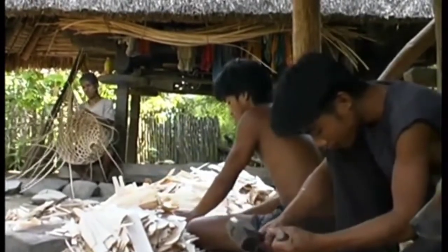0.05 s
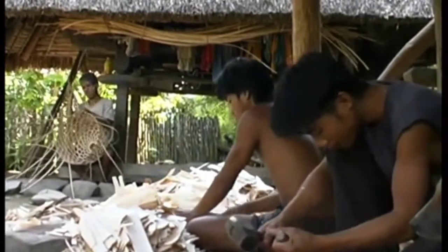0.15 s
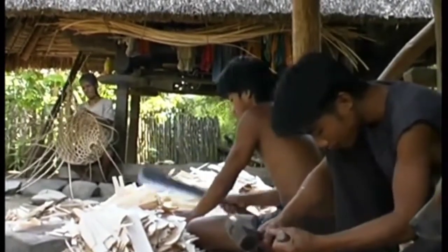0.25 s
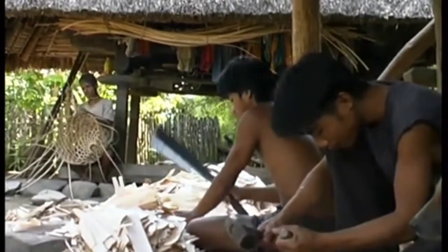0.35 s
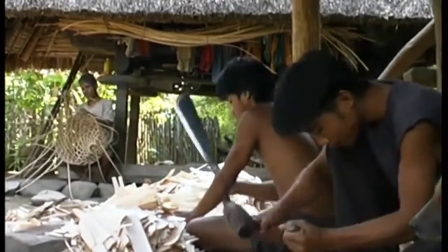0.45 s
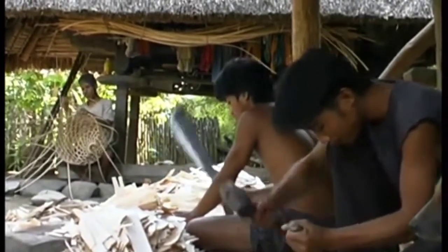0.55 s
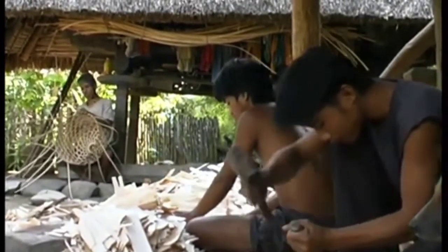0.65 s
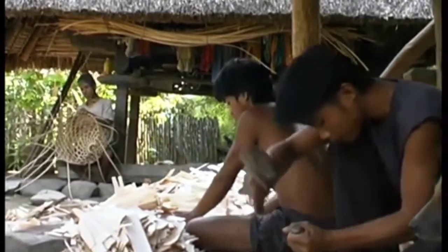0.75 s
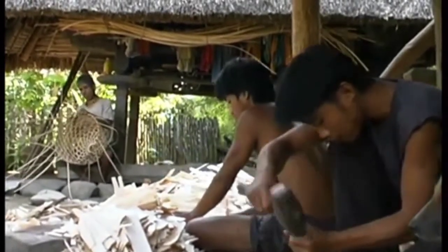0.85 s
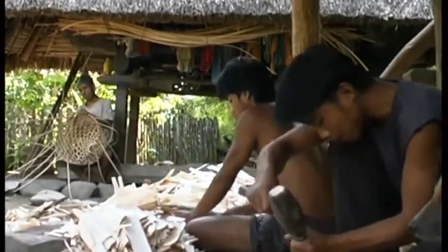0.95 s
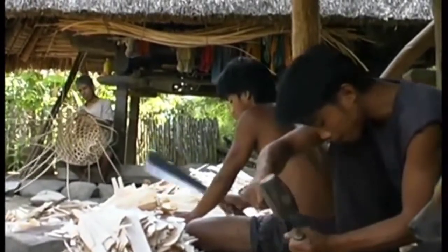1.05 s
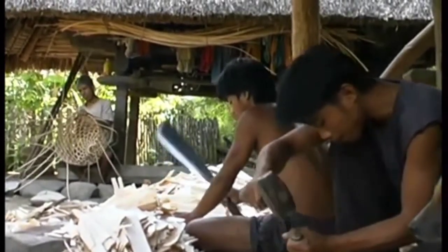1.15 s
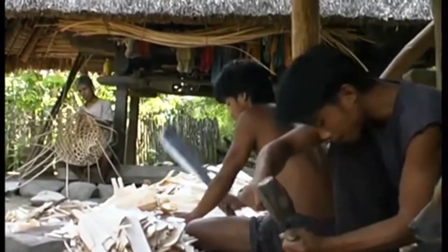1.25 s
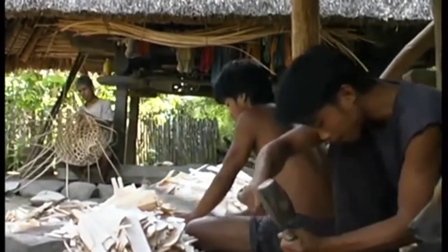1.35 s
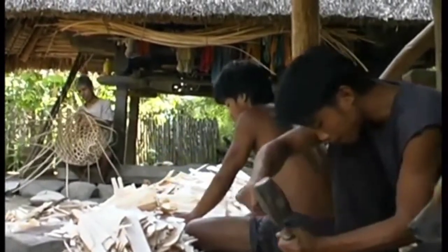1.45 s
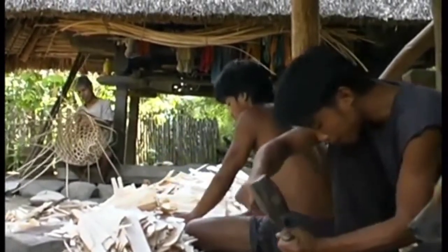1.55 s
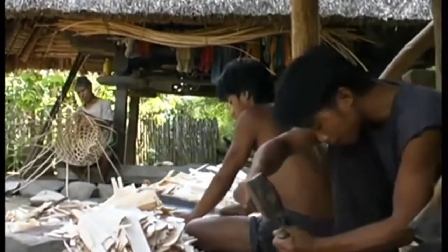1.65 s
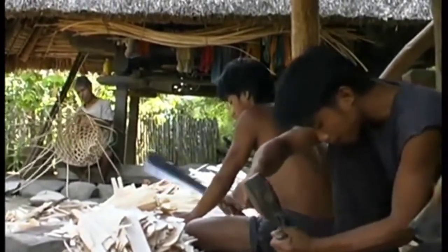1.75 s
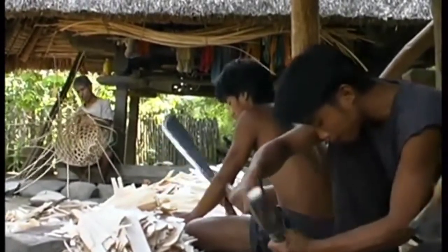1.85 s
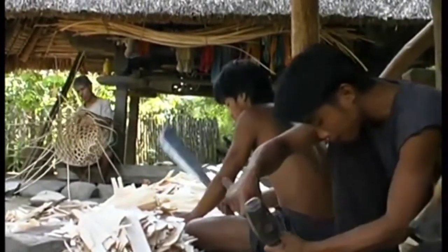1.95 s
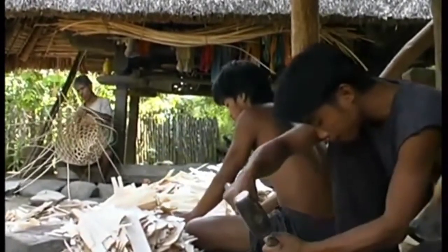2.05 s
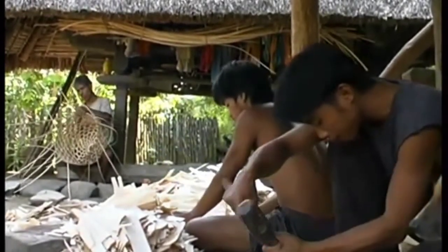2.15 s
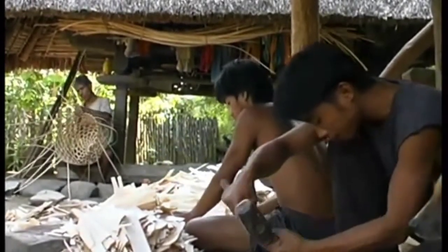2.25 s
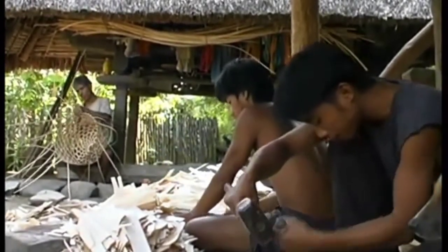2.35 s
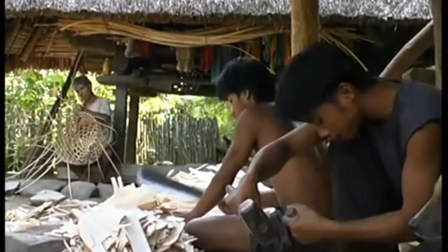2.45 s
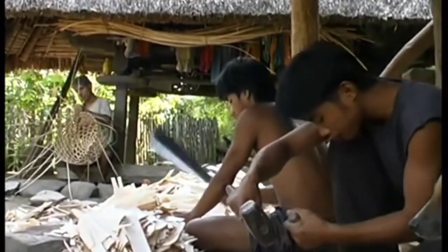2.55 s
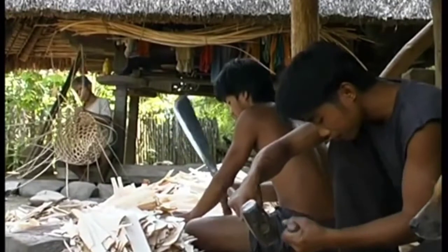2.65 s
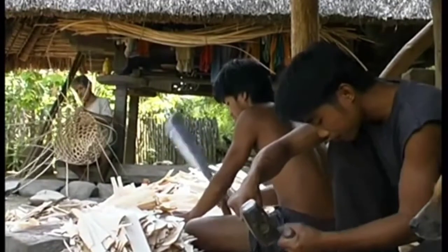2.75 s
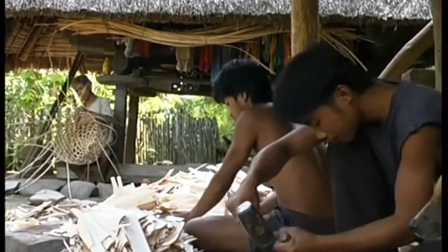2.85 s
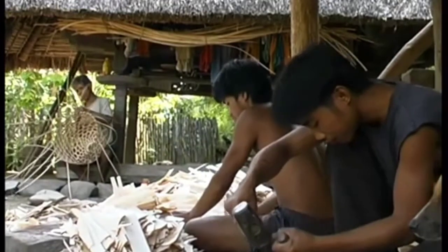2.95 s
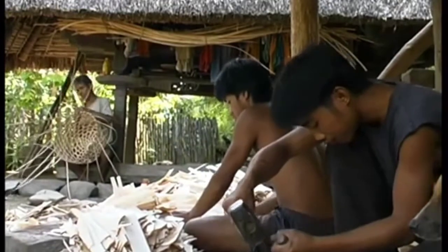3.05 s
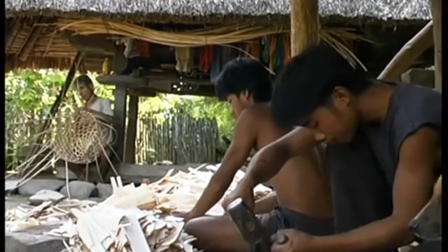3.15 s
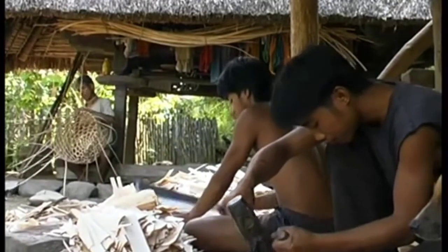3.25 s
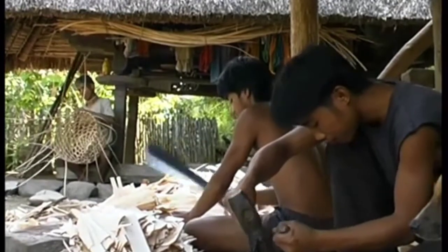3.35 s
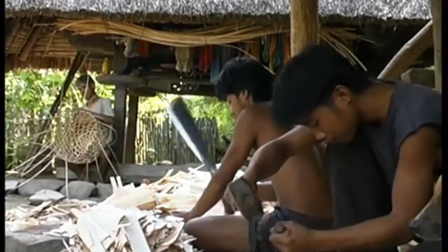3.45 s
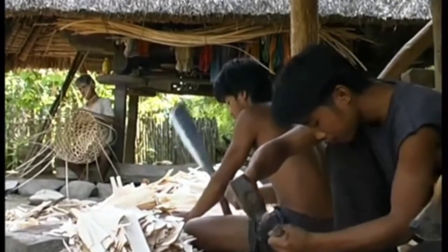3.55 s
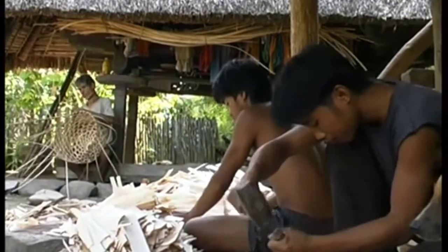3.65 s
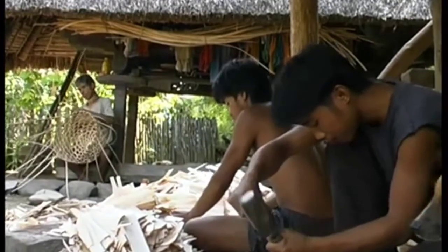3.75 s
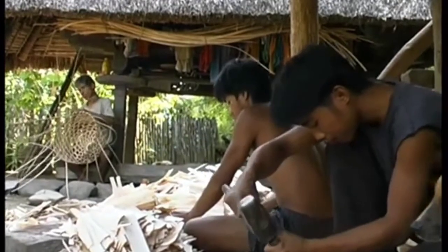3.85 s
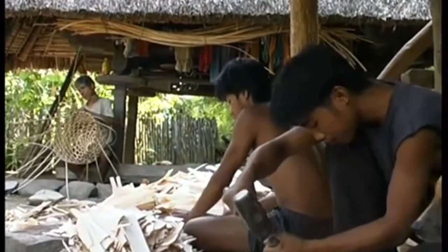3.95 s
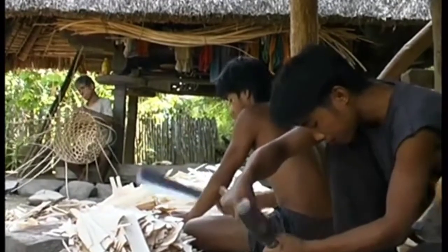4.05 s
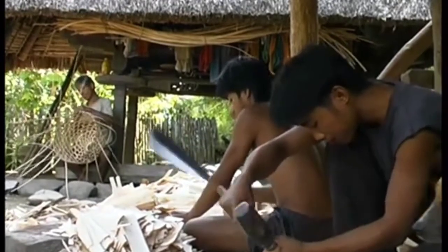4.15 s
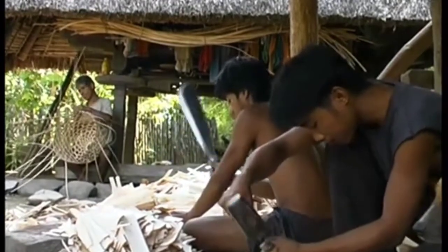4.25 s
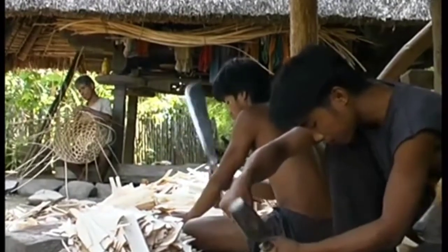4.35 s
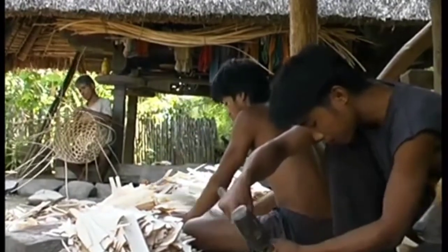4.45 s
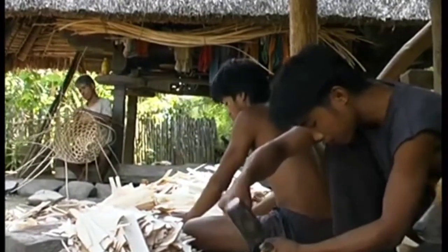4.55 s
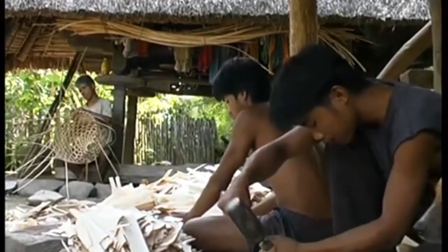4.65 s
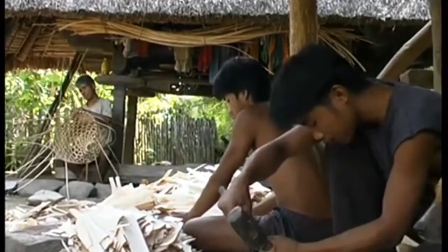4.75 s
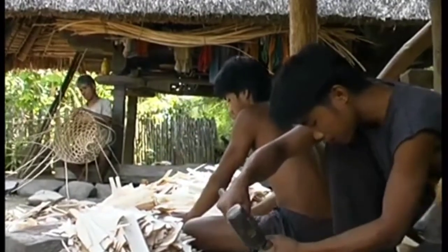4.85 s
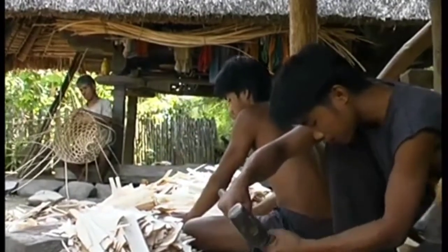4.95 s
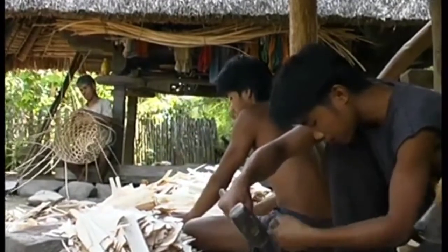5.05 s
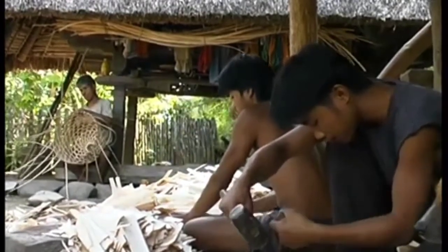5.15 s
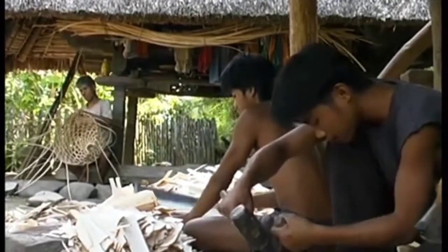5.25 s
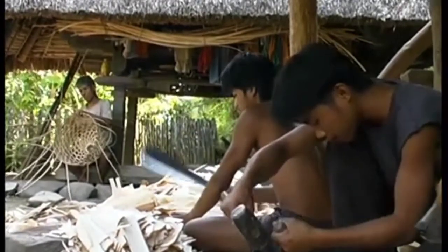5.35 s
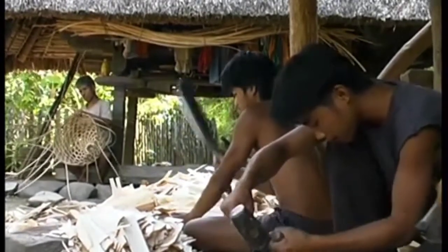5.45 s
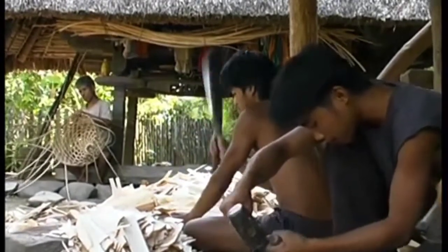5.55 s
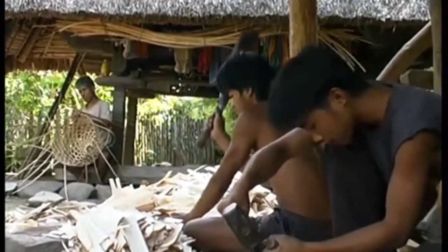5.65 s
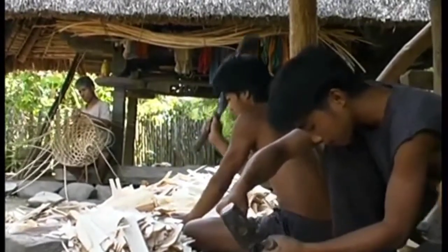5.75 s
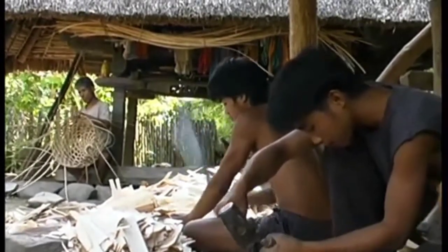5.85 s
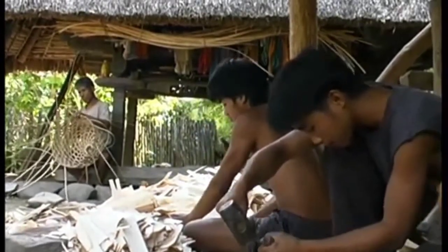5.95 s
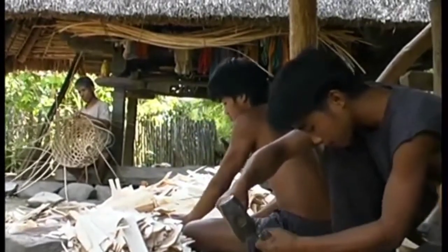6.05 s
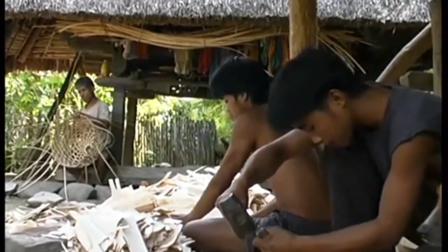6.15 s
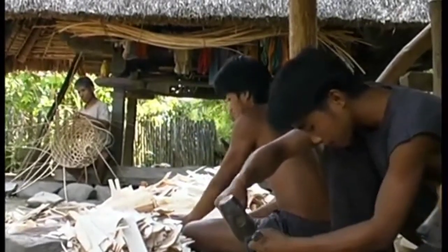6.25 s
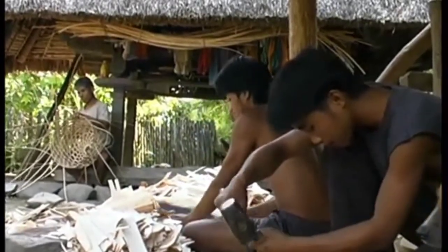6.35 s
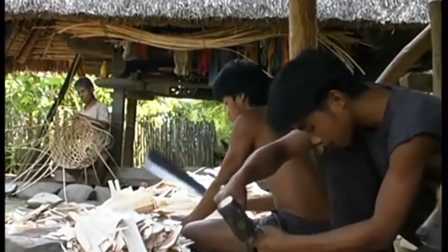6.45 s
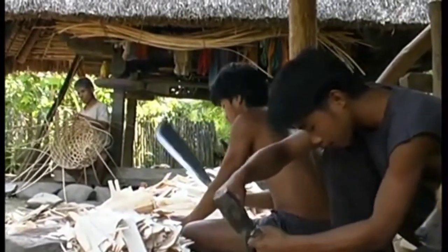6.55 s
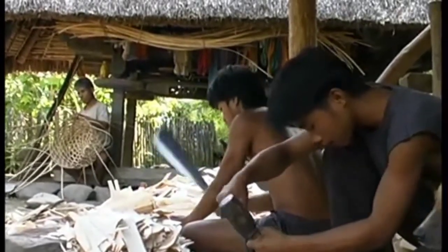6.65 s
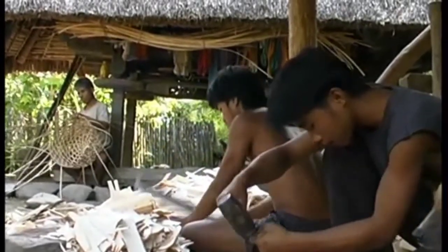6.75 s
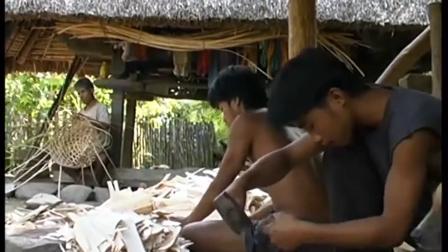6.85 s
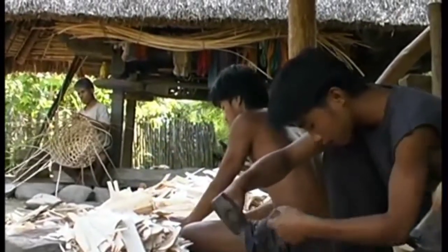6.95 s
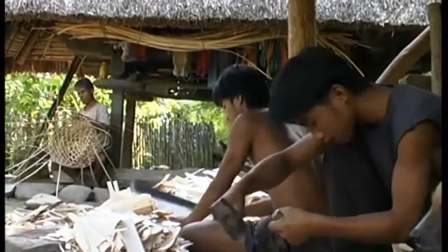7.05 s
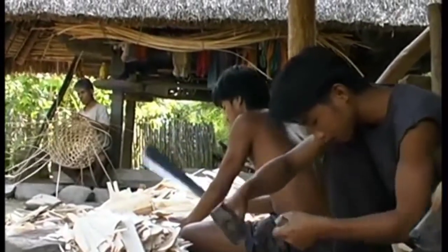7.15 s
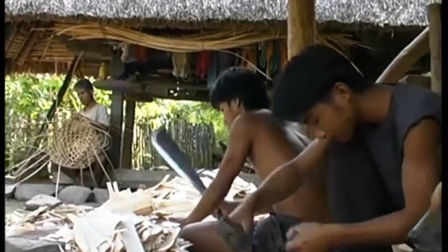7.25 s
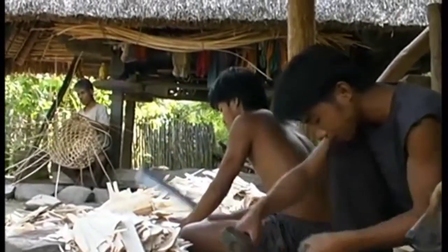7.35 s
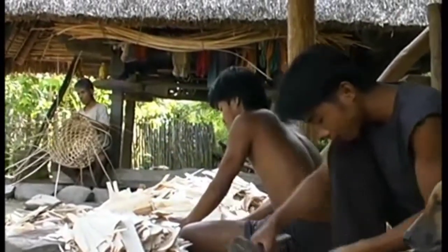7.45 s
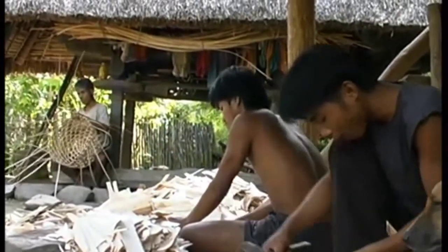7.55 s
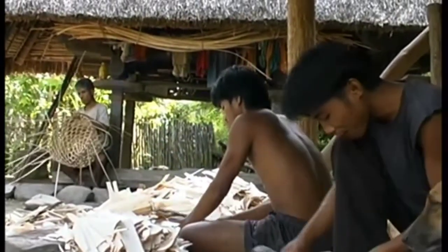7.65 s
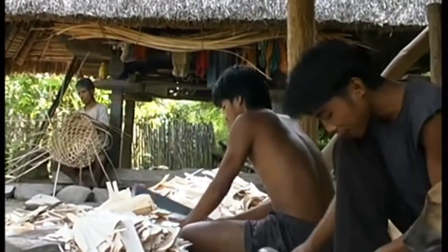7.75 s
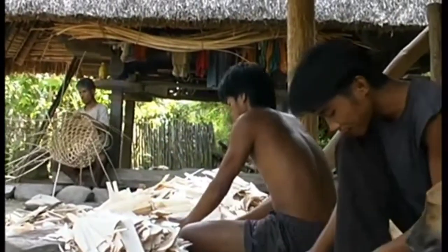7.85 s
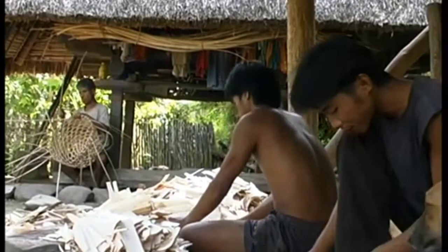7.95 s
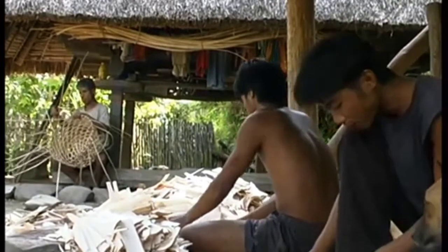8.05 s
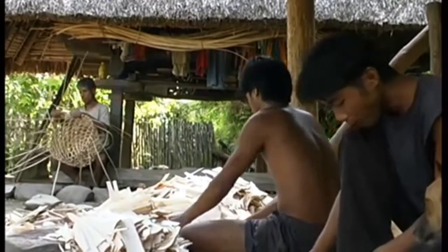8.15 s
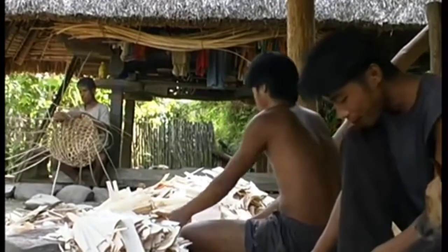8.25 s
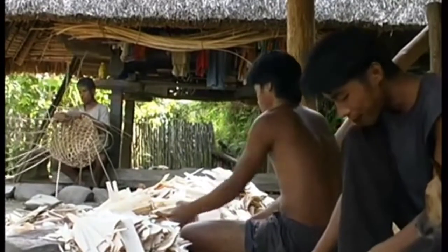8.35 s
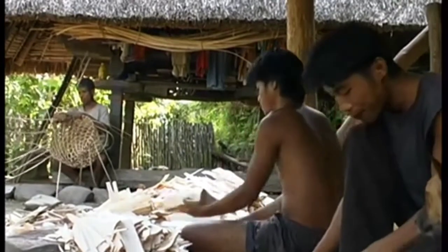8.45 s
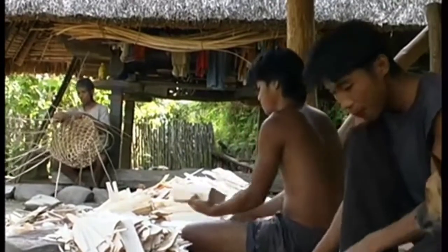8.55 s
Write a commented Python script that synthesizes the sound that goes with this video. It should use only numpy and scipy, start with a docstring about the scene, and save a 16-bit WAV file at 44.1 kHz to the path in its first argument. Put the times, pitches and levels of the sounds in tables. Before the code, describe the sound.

A close stereo outdoor scene of about 8.6 seconds in an open thatched workshop. A machete bites into a log with hard, crackling chops at about 0.7, 1.4, 2.1, 2.9, 3.7, 4.6, 6.0, 6.8, 7.5 and 7.9 s; the 6.0 s blow is the strongest and longest, and the hardest overload the microphone. Each has a short woody ring and a fast, dense echo. Lighter taps fall around 0.9, 1.9, 2.2, 4.1, 4.4, 4.8 and 6.7 s, with faint wood knocks between and near the end. Chicks peep continually in short falling chirps, near and far; another bird whistles briefly now and then. A hen gives one low hoarse grumble at 4.0-4.3 s. Insects hiss steadily, cicada phrases swell and stop about every 1.3 s, a distant motor wavers low, and soft wind thuds land around 5.4-5.5 s.

```python
"""A machete chops a log in an open thatched workshop; lighter taps and small knocks fall between the chops.
Each blow is a noise crackle plus decaying, beating wood modes, trailed by dense decaying-noise echoes.
Chicks peep (falling sines), another bird whistles almost flat, a hen grumbles once (noise through resonances).
Insects hiss and a far motor drones (narrow-band noise) over a floor of shaped outdoor noise.
Low noise and short thuds are wind on the microphone; the hardest chops overload it."""
import sys
import numpy as np
from scipy import signal
from scipy.fft import rfft, irfft, next_fast_len
from scipy.io import wavfile
from scipy.ndimage import uniform_filter1d

SR = 44100
rng = np.random.default_rng(int(sys.argv[2]) if len(sys.argv) > 2 else 0)


def pcm_store(signal):
    """Save signal as 16-bit PCM."""
    levels = np.round(np.clip(np.atleast_2d(signal), -1, 1) * 32767)
    wavfile.write(sys.argv[1], SR, levels.astype(np.int16).T)


N = 378814

# blows: mid-bite t/s, level/dB, then thud, body, knock, crack re ring band/dB, decay factor
CHOP_BLOWS = [(-.02, -21, 1, 1.5, 5, 6.5, .8), (0.7148, -4, -23.5, -4, 2, 2, 0.755),
              (1.437, -2.5, -19, -2.5, 3.5, -5.5, 0.65), (2.109, -4.5, -5.5, 0.5, -2, 2, 0.61),
              (2.9071, -1, -10, -12, -3.5, -1, 0.53), (3.732, -4, -10.5, -3.5, -1.5, 1.5, 0.64),
              (4.554, -10, -3, 4.5, 9, 9.5, 0.58), (5.982, 1.54, -26, -9, -2.5, -6.5, 1.1),
              (6.845, -0.4, -18.5, -4.5, 2, -10.5, 0.61), (7.463, -1, -24, -1, 1.5, -8, 0.66),
              (7.934, -1, -16, -3, -7.5, -14.5, .55)]
TAP_BLOWS = [(0.9314, -13, -17, -5, -3, -10.5, 0.58), (1.948, -12, -17, -8.5, 3.5, -8.5, 0.53),
             (2.1993, -10.5, -21.5, -7.5, -0.1, -18, 0.57), (3.828, -24.5, -17.5, -4, -4, -6.5, 1),
             (4.1283, -17.5, -17, 2.5, 6.5, -4, .83), (4.431, -17.5, -12, -4, 6.5, -4.5, 0.714),
             (4.76, -8.5, -9, -8.5, -3.5, -12, 0.793), (6.7184, -18.5, -3, -4, 4, -9.5, 0.67)]
KNOCK_BLOWS = [(1.575, -37, -15.5, -8.5, 6, -27.5, 0.77), (1.593, -35, -15.5, -7, 3.5, -31, .54),
               (2.389, -45, -6, 1.2, -5, 15.5, 0.28), (2.486, -45, -4, 6.5, 9.5, 4, 0.58),
               (2.758, -41, -2.5, -5, 3.5, -1, 0.37), (4.358, -46, 2.2, 8, 11, -0.53, 0.47),
               (4.9662, -30, 0, 5, -17, -6.5, 0.67), (6.282, -31, -21, -5, -10.5, -9, .86),
               (6.449, -31, -13, 2.5, -10.5, -8, 0.81), (7.745, -37, 8, 10, -9.5, -13, 0.67),
               (7.807, -40, 12.5, 14, 0, -6, 0.987), (7.8937, -16, -17, 2, -24, -24, 1),
               (8.17, -47, -1.2, 5, 5.5, 15, 1), (8.375, -29, -4, 8.5, -2.5, -14, 1),
               (8.42, -33, -5, 3, -18, -17, 1)]
# centres of thud, body, ring, knock, crack bands: f/Hz
BAND_CENTRES_HZ = [140, 340, 870, 1900, 6000]
# landing of each kind of blow: half bite time/s, left-right tilt/dB
CHOP_LANDING = (.003, .2)
TAP_LANDING = (.0006, 0)
KNOCK_LANDING = (.0023, -0.9)
# modes of the struck wood: nominal f/Hz, relative level/dB, t60/s at decay factor 1
LOG_MODES = [(158.3, -12.5, 0.42), (235.3, -4, 0.52), (262.5, -3, 0.34), (311.9, 0, 0.18), (382, 6, 0.13),
             (435.6, -3.5, 0.14), (481.9, -19.5, 0.2), (710, -2, 0.036), (819, 3, 0.099), (890, -4.5, 0.52),
             (1250, -11, 0.1), (1290, -8.5, 0.064), (1332, -1.5, 0.034), (1423, -10, 0.081),
             (1755, -10, 0.15), (2380, -23, 0.15), (2600, -31, 0.15), (3020, -4, 0.13), (3434, -8, 0.038),
             (4710, -15, 0.0734)]
STICK_MODES = [(232, 1.5, 0.033), (348.5, -2.5, 0.12), (515.4, -8, 0.055), (650, -1, 0.095),
               (1400, -5, 0.029), (1390, -9.5, .08), (1675, 7, 0.025), (2510, -7, 0.051),
               (3410, 1.5, 0.067), (4580, -11, .04)]
SCRAP_MODES = [(169.3, -8.5, 0.39), (343, -7.5, 0.071), (456.6, -6, 0.19), (829, -6.5, 0.16),
               (1144, -7.5, 0.2), (1440, -21, .1), (1652, 2.5, 0.056), (2270, -5, .08)]
# crackle spectrum: f/Hz, gain/dB
SPLINTER_SPECTRUM = [(60, -22), (150, 10.5), (400, -1), (1200, 5), (3000, -2), (6000, -5), (9000, -12.5),
                     (12000, -22.5), (16000, -48)]
# workshop reverberation: f/Hz, t60/s at decay factor 1
SHED_DECAY = [(100, 0.46), (300, 0.2324), (900, 0.14), (2500, 0.16), (6000, 0.15), (12000, 0.14)]
# outdoor floor spectrum: f/Hz, relative level/dB
AIR_SPECTRUM = [(15, -40), (25, -14), (70, -11), (130, 0.5), (180, -4.5), (2340, -18.5), (3800, -15),
                (5550, -20.5), (6700, -19), (7670, -20.5), (9520, -23), (10600, -30.5), (12800, -32.5),
                (14300, -33.5), (15900, -58)]
# outdoor floor stereo: f/Hz, left-right likeness/1
AIR_LIKENESS = [(60, 0.18), (180, -0.31), (550, 0.19), (1650, 0.22), (4970, 0.53), (15000, -0.24)]
# steady insect hiss: f/Hz, pole width/Hz, level/dB
INSECT_BANDS = [(6747, 960, -58.5), (8330, 900, -62.5)]
# cicada phrases: start t/s, end t/s, level before swell/dB
CICADA_PHRASES = [(0.198, 1.25, -60), (1.702, 2.681, -58.5), (3.153, 4.266, -59.5), (4.453, 5.48, -61),
                  (5.747, 6.76, -60.5), (7.146, 8.42, -63)]
# motor drone: t/s, f/Hz, level/dB
MOTOR_CURVE = [(0, 82.5, -65), (.3, 92, -62), (.65, 124, -57), (1.1, 125.4, -70), (2.4, 119, -52.5),
               (2.9, 116.5, -79), (3.3, 119, -53), (3.55, 136, -63.5), (4.3, 122, -59), (5, 130, -63),
               (5.3, 117, -80), (8.59, 104.1, -71)]
# wind thuds: t/s, level/dB, f/Hz, Gaussian length/s
WIND_PUFFS = [(5.409, -34.5, 69, 0.009), (5.523, -36, 42, 0.023), (4.5, -53, 52, 0.017),
              (7.817, -44, 60, 0.025)]
# near chick peeps: t/s, start f/Hz, mid level/dB
NEAR_PEEPS = [(.094, 4400, -52.5), (.165, 3980, -54), (.208, 4570, -55), (.262, 4000, -51),
              (.318, 3710, -58), (.379, 3970, -52), (.41, 3910, -56), (.462, 4870, -60), (.505, 3700, -58),
              (.53, 4200, -72), (.595, 4200, -61), (1.022, 4780, -54), (1.115, 4770, -50.5),
              (1.225, 4390, -55.5), (1.265, 4900, -54), (1.315, 4750, -54), (1.376, 5230, -48),
              (1.755, 5250, -56), (1.844, 4520, -51), (1.868, 3768, -49), (1.98, 5150, -58.5),
              (2.281, 4810, -50), (2.289, 3750, -53), (2.325, 4900, -62), (2.385, 4220, -60.5),
              (2.445, 5200, -56), (2.56, 4300, -55.5), (2.6, 4300, -56.5), (2.7, 4800, -57),
              (2.76, 5100, -55), (2.85, 4070, -56), (3.039, 3600, -57.5), (3.156, 4306, -55),
              (3.282, 4100, -55), (3.36, 3870, -59), (3.398, 4200, -53), (3.404, 5180, -54.5),
              (3.505, 5300, -59), (3.542, 4430, -51.5), (3.59, 5170, -58), (3.665, 5000, -57),
              (3.85, 3880, -53), (3.914, 4970, -52), (3.99, 4200, -51), (4.044, 5030, -54),
              (4.25, 4900, -55), (4.395, 4110, -52), (4.488, 5120, -53.5), (4.705, 3960, -52),
              (4.8, 4740, -56), (4.823, 3810, -49.5), (4.944, 5180, -49.5), (5.07, 5310, -54.5),
              (5.27, 4240, -60), (5.28, 5300, -51), (5.371, 4279, -52), (5.386, 3539, -53),
              (5.392, 5050, -54.5), (5.415, 5190, -53.5), (5.52, 4130, -56.5), (5.545, 5365, -51.5),
              (5.685, 5610, -53), (5.762, 5100, -57), (5.876, 5200, -53), (6.171, 5400, -59),
              (6.325, 4400, -59.5), (6.36, 4090, -57), (6.43, 4860, -61), (6.545, 5300, -56),
              (6.645, 3400, -56), (6.791, 4200, -61), (7.105, 4800, -57.5), (7.208, 4230, -61.5),
              (7.224, 5630, -63), (7.355, 4550, -52.5), (7.636, 5900, -63.5), (7.754, 4787, -60),
              (7.875, 5400, -58), (8, 5150, -57), (8.096, 4132, -58), (8.16, 4740, -58),
              (8.334, 4000, -53.5), (8.465, 5950, -60.5), (8.529, 4488, -54)]
# almost flat whistles of another bird: t/s, start f/Hz, mid level/dB
BIRD_WHISTLES = [(.79, 6024, -56), (2.85, 5550, -58), (4.382, 4850, -58), (6.665, 5500, -58.5),
                 (8.135, 6040, -50.5), (8.212, 6050, -59), (8.441, 5180, -56.5)]
# hen envelope: t/s, level/dB
HEN_CURVE = [(3.985, -39), (4.005, -36.5), (4.05, -44), (4.07, -56), (4.1, -49), (4.2, -43.5),
             (4.26, -55.5), (4.35, -59.5)]

BLOW_S = 0.48  # at decay factor 1
AIR_DB = -50.5
THROAT_HZ = 663.2
# all peeps end on one note; each Hz of fall lengthens the peep
PEEP_MIN_S, PEEP_FALL_HZ_PER_S, PEEP_END_HZ = 0.024, 50000, 2931
WHISTLE_S, WHISTLE_SAG = 0.051, 0.024  # sag: fraction of start pitch


def amp(db):
    """Amplitude ratio from decibels."""
    return 10 ** (np.asarray(db) / 20)


def evened(x):
    """Scales to unit RMS."""
    return x / np.sqrt(np.mean(x ** 2) + 1e-20)


def read(points, hz):
    """Reads a spectrum table, linear over log frequency."""
    f, value = np.transpose(points)
    return np.interp(np.log(hz + 1), np.log(f + 1), value)


def curves(rows, t):
    """Interpolates every column of a time table."""
    row_s, *columns = np.transpose(rows)
    return [np.interp(t, row_s, column) for column in columns]


def add(mix, start_s, sound, pan_db):
    """Places a sound, cutting what falls outside, tilted left or right."""
    at = round(start_s * SR)
    sound = np.atleast_2d(sound)[:, max(-at, 0):]
    sound = sound * amp([[pan_db / 2], [-pan_db / 2]])
    part = mix[:, max(at, 0):][:, :sound.shape[1]]
    part += sound[:, :part.shape[1]]


def resonate(x, hz, pole_width_hz):
    """Resonance at a fixed or moving pitch: shift to zero, smooth twice, shift back."""
    turn = np.exp(2j * np.pi * np.cumsum(hz * np.ones(x.shape[-1])) / SR)
    r = np.exp(-np.pi * pole_width_hz / SR)
    smooth = x / turn
    for _ in range(2):
        smooth = signal.lfilter([1 - r], [1, -r], smooth)
    return 2 * (turn * smooth).real


def pair(length, likeness):
    """Two noises with the given correlation."""
    a, b = rng.standard_normal((2, length))
    likeness = np.clip(likeness, 0, 1)
    return np.array([a, likeness * a + np.sqrt(1 - likeness ** 2) * b])


def shed(dry, likeness, slow):
    """Scattered reflections off posts, thatch and ground: noise decaying per band, plus a fainter, slower tail."""
    hz, t, z = signal.stft(pair(SR // 2, likeness), SR, nperseg=256)
    t60 = slow * read(SHED_DECAY, hz)[:, None]
    decay = amp(-60 * t / t60) + amp(-22.5 - 60 * t / (5.95 * t60))
    tail = signal.istft(z * decay, SR, nperseg=256)[1]
    tail *= np.minimum(np.arange(tail.shape[1]) / (0.0046 * SR), 1)  # 4.6 ms onset
    return signal.fftconvolve(dry[None], tail / np.linalg.norm(tail[0]), axes=1)


def crackle_spectrum(t, f, bite_s, snap_s):
    """Fibre noise swells through the bite, then decays from a jolt as the edge stops."""
    fibres = pair(len(t), 0.8874) * amp(1.18 * rng.standard_normal(len(t)))
    cut = np.where(t < 0, (1 + t / (2 * bite_s)) ** 0.52, 0) * fibres
    decay = amp(-60 * t / snap_s) + 0.83 * amp(-60 * t / 0.0052)
    stop = np.where(t < 0, 0, decay) * fibres
    return rfft(cut) * f / (f + 1200) + rfft(stop)  # tearing is thin; weight arrives with the stop


def wood_ring(t, modes, slow):
    """Uneven wood splits each mode into three close, beating partials, mixed anew per blow."""
    hz, mode_db, t60 = np.repeat(modes, repeats=3, axis=0).T[:, :, None]
    size, detune, side = rng.standard_normal((3, len(hz), 1))
    after = np.maximum(t, 0)
    level = amp(mode_db + 1.36 * size - 60 * after / (t60 * slow))
    partials = level * np.sin(2 * np.pi * hz * (1 + 0.03196 * detune) * after)
    rings = (1 + 0.66 * np.array([side, -side])[..., 0]) @ partials  # each leans to one side
    chatter = evened(uniform_filter1d(pair(len(t), 0.889), size=120))
    return rings * amp(5.34 * chatter)  # the piece chatters on its rest


def blow(row, landing, modes, ring_db, wet_db, snap_s):
    """The edge bites in with a swelling crackle, stops dead, and the wood rings; snap_s is at decay factor 1."""
    mid_s, db, thud_db, body_db, knock_db, crack_db, slow = row
    bite_s, pan_db = landing
    bands_db = [thud_db, body_db, 0, knock_db, crack_db]
    t = np.arange(next_fast_len(round(BLOW_S * slow * SR))) / SR - 2 * bite_s  # zero when the edge stops
    f = np.fft.rfftfreq(len(t), 1 / SR)

    crackle = crackle_spectrum(t, f, bite_s, snap_s * slow)
    splinters = crackle * amp(read(SPLINTER_SPECTRUM, f))
    wood = amp(ring_db) * rfft(wood_ring(t, modes, slow))
    colour = amp(read(list(zip(BAND_CENTRES_HZ, bands_db)), f))
    fade = np.minimum((t[-1] - t) / 0.1, 1)
    dry = irfft((splinters + wood) * colour, len(t)) * fade

    # crackle differs by direction: the shed gets its mean colour, sent as the edge stops
    mean = np.sqrt(abs(uniform_filter1d(abs(splinters[0]) ** 2, size=250)))
    mean = mean * np.exp(-4j * np.pi * f * bite_s)
    send = irfft((mean + wood[0]) * colour, len(t)) * fade * (t > -bite_s)
    sound = amp(wet_db) * shed(send, 0.39, slow)
    sound[:, :len(t)] += dry
    # each blow is kept free of deep bass
    sound = signal.sosfilt(signal.butter(4, 112, "high", fs=SR, output="sos"), sound)
    return mid_s - bite_s, amp(db) * sound, pan_db


def air():
    """The outdoor floor: random short-time spectra with drifting patches."""
    frames, hz = N // 256 + 5, np.fft.rfftfreq(1024, 1 / SR)
    a, b, c, d, patches = rng.standard_normal((frames, 513, 5)).T
    patches = uniform_filter1d(patches, size=12, axis=0)
    patches = evened(uniform_filter1d(patches, size=14, axis=1))
    likeness = np.clip(read(AIR_LIKENESS, hz), -1, 1)[:, None]
    left = a + 1j * b
    right = likeness * left + np.sqrt(1 - likeness ** 2) * (c + 1j * d)
    z = np.array([left, right]) * amp(read(AIR_SPECTRUM, hz)[:, None] + 1.65 * patches)
    return amp(AIR_DB) * evened(signal.istft(z, nperseg=1024, noverlap=768)[1][:, :N])


def insects():
    """Two steady noise bands, and a cicada noise band whose phrases swell, climb and stop short."""
    out = sum(amp(db) * evened(resonate(pair(N, 0.33), hz, width_hz)) for hz, width_hz, db in INSECT_BANDS)
    for start_s, end_s, db in CICADA_PHRASES:
        u = np.linspace(0, 1, round((end_s - start_s) * SR))
        climb = 1 - np.exp(-u / 0.24)
        buzz = evened(resonate(pair(len(u), 0.1), 8300 + 1430 * climb, 480))
        add(out, start_s, amp(db) * buzz * climb * np.minimum((1 - u) / 0.063, 1), 0)
    return out


def motor():
    """A wavering drone: noise in a narrow resonance whose pitch follows the engine speed."""
    hz, db = curves(MOTOR_CURVE, np.arange(N) / SR)
    return amp(db) * evened(resonate(rng.standard_normal(N), hz, 19))


def wind():
    """A lumpy low-passed rumble of air on the microphone ports, with a few short low thuds."""
    lumps = amp(1.1 * evened(uniform_filter1d(rng.standard_normal(N), size=4000)))
    rumble = signal.lfilter(*signal.butter(2, 55, fs=SR), pair(N, 0.59)) * lumps
    out = amp(-63.0) * evened(rumble)
    for mid_s, db, hz, length_s in WIND_PUFFS:
        t = np.arange(-3 * length_s, 3 * length_s, 1 / SR)
        phase = rng.uniform(0, 1.1, (2, 1))
        thud = np.cos(2 * np.pi * hz * t + phase) * np.exp(-(t / length_s) ** 2)
        add(out, mid_s + t[0], amp(db) * thud, 0)
    return out


def call(length_s, start_hz, end_hz, db):
    """A slightly hoarse, wobbling sine that falls and swells; the higher it starts, the longer it holds."""
    u = np.linspace(0, 1, round(length_s * SR))
    wobble, flutter = uniform_filter1d(rng.standard_normal((2, len(u))), size=150)
    hz = start_hz - (start_hz - end_hz) * u ** (start_hz / 2600) + 65 * evened(wobble)
    level = amp(db + 4.46 * evened(flutter) + 4.0 * (u - 0.5)) * signal.windows.tukey(len(u), 0.35)
    return level * np.sqrt(2) * np.sin(2 * np.pi * np.cumsum(hz) / SR)


def chicks_and_bird(far_db=-67, far_count=110):
    """Near chick peeps, fainter scattered far peeps and another bird's whistles, all trailed by echoes."""
    dry = np.zeros((2, N))
    far = [(when * N / SR, 3600 + 1900 * high, far_db + 6 * loud)
           for when, high, loud in rng.random((far_count, 3))]
    for start_s, hz, db in NEAR_PEEPS + far:
        length_s = PEEP_MIN_S + abs(hz - PEEP_END_HZ) / PEEP_FALL_HZ_PER_S
        add(dry, start_s, call(length_s, hz, PEEP_END_HZ, db), 1.8 * rng.standard_normal())
    for start_s, hz, db in BIRD_WHISTLES:
        whistle = call(WHISTLE_S, hz, hz * (1 - WHISTLE_SAG), db)
        add(dry, start_s, whistle, 1.8 * rng.standard_normal())
    return dry + amp(-3.0) * shed(dry.mean(0), 0.41, 0.96)[:, :N]


def hen():
    """A hoarse low grumble: breath noise in a narrow throat, with two fainter resonances above."""
    t = np.arange(HEN_CURVE[0][0], HEN_CURVE[-1][0], 1 / SR)
    db, = curves(HEN_CURVE, t)
    breath = rng.standard_normal(len(t))
    throat = [(1, 88, 0.5), (1.28, 111, -12), (1.65, 110, -19)]  # f ratio, pole width/Hz, level/dB
    voice = sum(amp(gain_db) * evened(resonate(breath, ratio * THROAT_HZ, width_hz))
                for ratio, width_hz, gain_db in throat)
    dry = amp(db) * voice * signal.windows.tukey(len(t), 0.05)
    sound = amp(1) * shed(dry, 0.15, 1.8)
    sound[:, :len(t)] += dry
    return t[0], sound, -1.5


def scene():
    """Sums the background layers, the hen and every blow."""
    mix = air() + insects() + motor() + wind() + chicks_and_bird()
    add(mix, *hen())
    for row in CHOP_BLOWS:
        add(mix, *blow(row, CHOP_LANDING, LOG_MODES, ring_db=-26.0, wet_db=-4.5, snap_s=0.038))
    for row in TAP_BLOWS:
        add(mix, *blow(row, TAP_LANDING, STICK_MODES, ring_db=-26, wet_db=-2.5, snap_s=0.0422))
    for row in KNOCK_BLOWS:
        add(mix, *blow(row, KNOCK_LANDING, SCRAP_MODES, ring_db=-19.0, wet_db=0.5, snap_s=0.19))
    return mix


def record(dry):
    """The left port is a little hotter; the converter clips at full scale; then the band limit."""
    clipped = np.clip(dry * amp([[0.3], [-0.3]]), -1, 1)
    low_pass = signal.firwin(511, 16070, window=("kaiser", 9), fs=SR)  # cutoff in Hz
    return signal.oaconvolve(clipped, low_pass[None], "same")


dry = scene()
out = record(dry)
pcm_store(out)
```